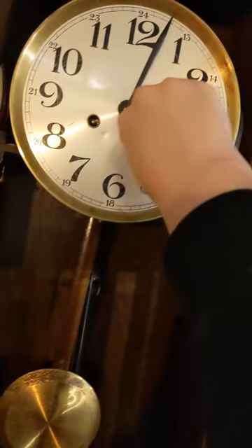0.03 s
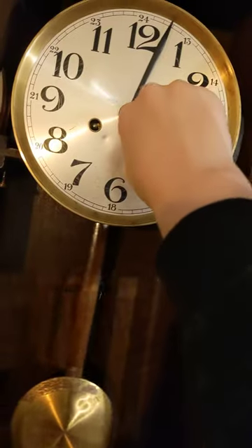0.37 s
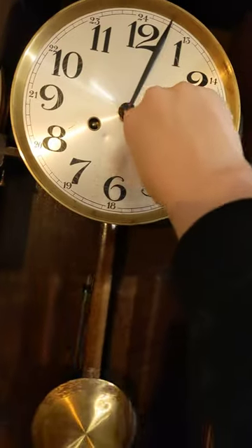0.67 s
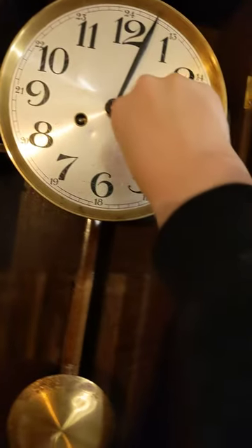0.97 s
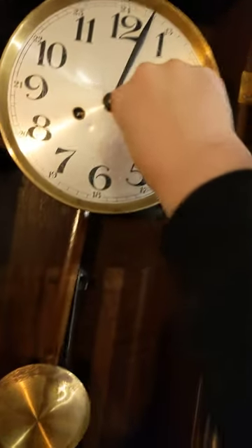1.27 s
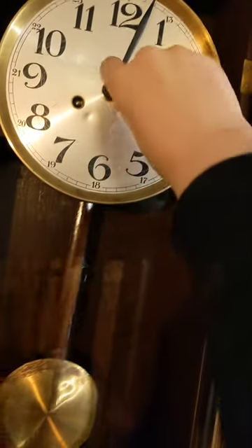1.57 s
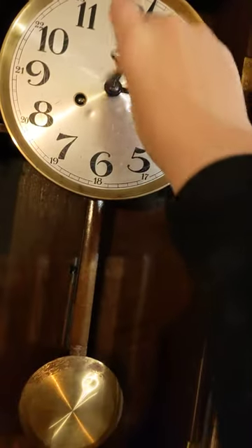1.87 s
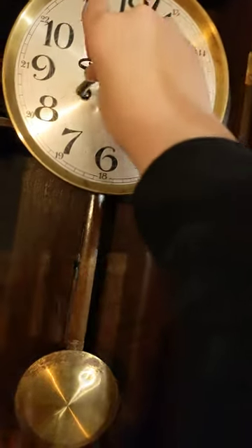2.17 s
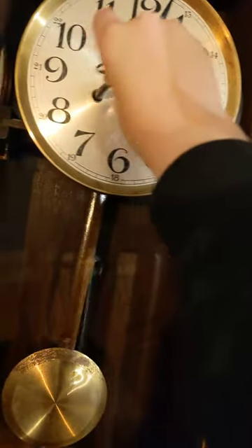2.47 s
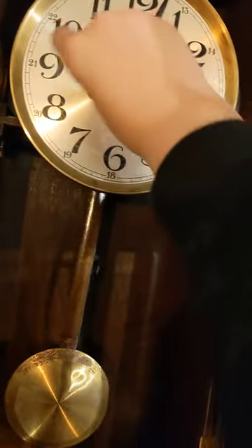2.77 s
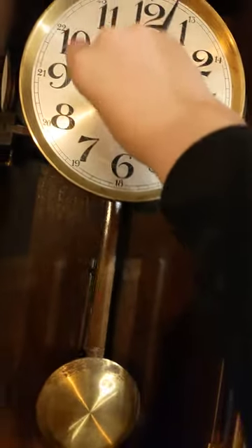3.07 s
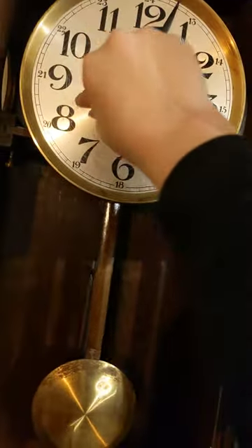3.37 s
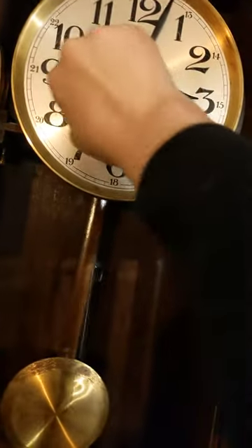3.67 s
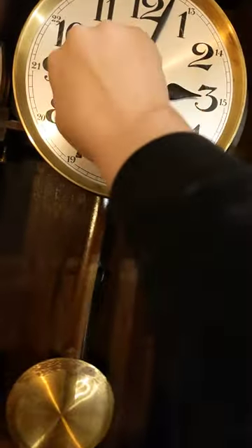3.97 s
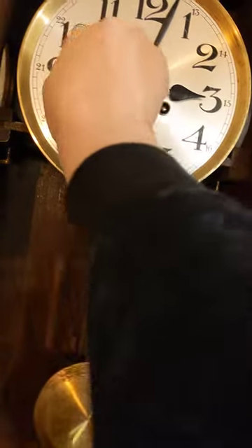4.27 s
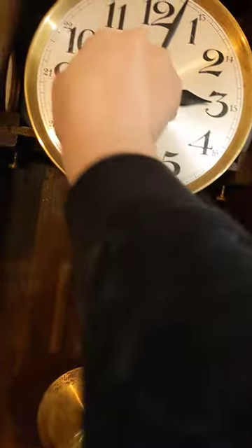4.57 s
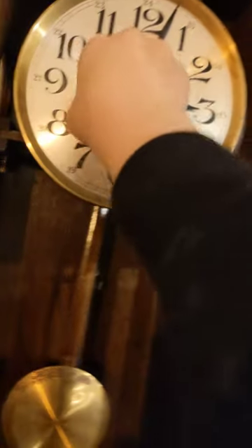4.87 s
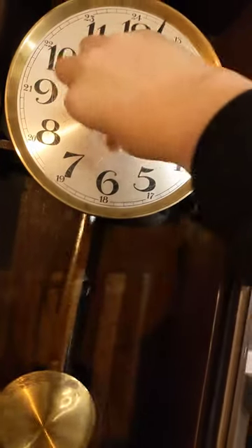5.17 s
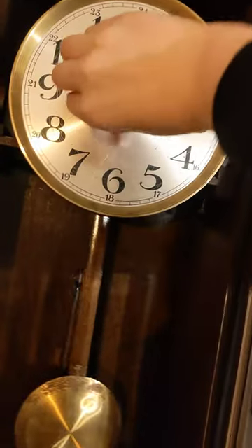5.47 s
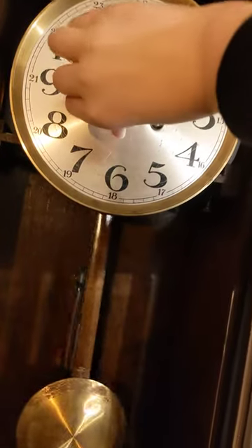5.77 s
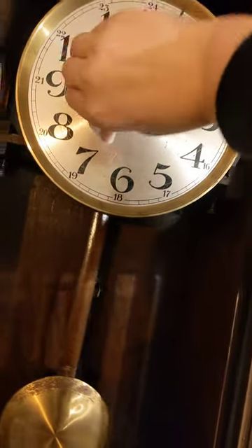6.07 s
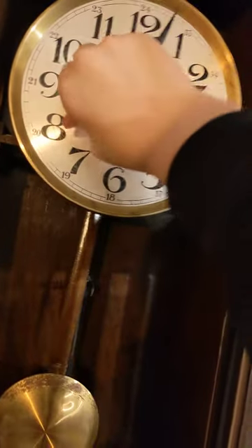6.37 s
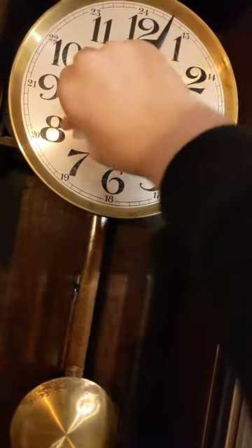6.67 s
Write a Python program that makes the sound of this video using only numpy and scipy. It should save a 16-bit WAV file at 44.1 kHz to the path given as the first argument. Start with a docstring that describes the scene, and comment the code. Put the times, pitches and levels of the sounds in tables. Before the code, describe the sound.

A pendulum wall clock ticks faintly and evenly, close by in a small quiet room. For the first few seconds a steel key clacks and scrapes lightly into place, while a hand bumps the wooden case and a sleeve rustles softly. Then the key turns, giving three loud, sharp ratchet clicks. After a pause, a second turn gives four more.

```python
"""A pendulum wall clock is wound with a key, close by in a small room.
From the start the escapement ticks, about every 0.6 s. Over the first three seconds the steel key clacks
and scrapes onto its arbor, while the hand bumps the wooden case and a sleeve rustles. Just after 4 s a first
turn lets the pawl snap over three ratchet teeth, and just after 6 s a second turn over four more;
each impact excites the modes of the pawl spring, the brass movement and the case."""
import sys
import numpy as np
from scipy import signal
from scipy.fft import rfft, irfft, next_fast_len
from scipy.io import wavfile
from scipy.ndimage import map_coordinates

SR = 44100
rng = np.random.default_rng(int(sys.argv[2]) if len(sys.argv) > 2 else 0)


def unload_wav(signal):
    """Save mono or channel-first audio to the path in sys.argv[1] as 16-bit WAV at rate SR, clipped to [-1, 1]."""
    wavfile.write(
        sys.argv[1],
        SR,
        np.round(np.clip(np.atleast_2d(signal).T, -1, 1) * 32767).astype(np.int16),
    )


N = 295911
TIME = np.arange(N) / SR
RING_SIZE = SR // 2
AGE = np.arange(RING_SIZE) / SR  # time since an impact, t/s


# the pawl drops off a tooth: t/s, relative levels of snap/dB, thump/dB and spring/dB, hardness/dB
PAWL_DROPS = [(4.099, -12.5, -26, -30.5, -1.5), (4.259, -15.5, -57.5, -29, 7),
              (4.4566, -12.5, -32.5, -43, 1.5), (6.161, -13, -65, -42, 4), (6.26, -11, -29.5, -34.5, 4),
              (6.3519, -10, -31, -36, -0.5), (6.5251, -13, -33.5, -41.5, 2.5)]
# spectrum of the snap: f/Hz, level/dB
SNAP_SPECTRUM = [(100, -14.5), (400, -11), (900, -1.5), (1500, -2.5), (2600, 1), (3100, -3.5), (5200, 0),
                 (6500, 1), (8000, -2), (10000, -5), (11700, 3), (12700, 0), (14500, 2.5), (15700, 2)]
# spectrum of the case's response to the snap: f/Hz, level/dB
CASE_SPECTRUM = [(60, -31), (200, -11), (300, -16), (450, -3.5), (800, -1.5), (1400, -5.5), (2000, -2),
                 (2600, -6.5), (3000, -6.5), (3600, -6.5), (6000, -6), (10000, -10), (13500, -8),
                 (16000, -20)]
# stereo balance of the pawl: f/Hz, left minus right level/dB
PAWL_BALANCE = [(300, -2), (2500, 1), (4000, -2.5), (6000, 0), (9500, -6.5), (12500, -3), (15500, -13.5)]
# modes of the brass movement: f/Hz, level/dB, T60/s
MOVEMENT_MODES = [(389, -9, .4), (490, -5, .35), (530, -5, .38), (648, -5, .25), (812, 2.5, .2),
                  (834, -4, .2), (1029, -1, .25), (1190, -4, .18), (1405, -4, .22), (1823, -3, .15),
                  (2012, -3, .13), (2135, -2, .13), (2385, -3, .16), (2471, -3, .16), (3731, -4, .11),
                  (4204, -3, .11), (5367, -1, .07), (5818, -1, .06), (6310, -1, .07), (6820, -2, .09),
                  (7660, -2, .06), (8960, -2, .06), (13620, 3, .05)]
# modes of the pawl spring: f/Hz, level/dB, T60/s
SPRING_MODES = [(2565, -2, .15), (2611, 0, .19), (2680, -4, .11), (2770, -1, .14)]
def ratchet(variation=0.89, snap_t60=0.023, snap_gain_db=15.5, case_db=-23.5, wall_delay_s=0.021):
    """Impact excitation: the pawl slaps the same wheel at each tooth, ringing spring, movement and case."""
    track = np.zeros((2, N))
    wheel, case = noise(SNAP_SPECTRUM, PAWL_BALANCE), noise(CASE_SPECTRUM, PAWL_BALANCE)
    # the blow spreads through the plates for a few milliseconds, then drains into the case
    envelope = rise(.0024) ** 2 * decay(snap_t60)
    for t, snap_db, thump_db, spring_db, hardness_db in PAWL_DROPS:
        contact = unit(wheel + variation * noise(SNAP_SPECTRUM, PAWL_BALANCE))
        snap = amp(snap_db + snap_gain_db) * contact * envelope
        snap = chatter(resonance(snap, hz=5300, q=1, db=hardness_db), spread_s=.0016, rebound=.42)
        body = unit(case + variation * noise(CASE_SPECTRUM, PAWL_BALANCE))
        body = chatter(reverberation(body, attack_s=.004), spread_s=.002, rebound=.35)
        body += amp(-13.5) * ring(MOVEMENT_MODES, scatter_db=1)
        spring = ring(SPRING_MODES, scatter_db=5)
        add(track, t, snap + amp(case_db) * body + amp(thump_db) * thump() + amp(spring_db) * spring)
        add(track, t + wall_delay_s, amp(-18) * snap)  # reflection from a wall
    return track


def thump(hz=55, t60=0.063, jolt_db=30, jolt_t60=0.0056):
    """Damped oscillation: a jolt and a low swing under the snap, mostly on the right."""
    swing = np.cos(2 * np.pi * hz * AGE) * decay(t60)
    jolt = amp(jolt_db) * decay(jolt_t60)
    highpass = signal.butter(N=4, Wn=44, btype="high", fs=SR, output="sos")
    return signal.sosfilt(highpass, (swing + jolt) * rise(.003)) * amp([[-17], [5]])


# the key hits the arbor: t/s, level/dB, relative level of the bright edge/dB
KEY_CLACKS = [(0.422, -44.5, -2.5), (0.723, -59, 0), (1.786, -31, -2), (1.796, -43, 1), (2.36, -41, -3),
              (2.387, -42, -11), (2.509, -27, -27), (2.53, -22.5, -7), (2.981, -28, -26), (3.603, -56, -9),
              (3.916, -48.5, -27), (4.001, -44, -37.5), (4.683, -51.5, -4), (6.046, -53, 4.5)]
def key_clacks(case_db=-4, case_hz=470):
    """Mechanical coupling: each clack of the key on its arbor also drives the case."""
    track = np.zeros((2, N))
    for t, db, edge_db in KEY_CLACKS:
        add(track, t - .0015, amp(db) * (steel(edge_db) + amp(case_db) * wood(case_hz)))
    return track


# spectrum of a steel contact: f/Hz, level/dB
STEEL_SPECTRUM = [(300, -19), (700, -2.5), (1000, 3), (1400, -6.5), (2100, -0.5), (2650, -3), (3050, -7),
                  (4200, -17), (6000, -18), (12000, -45.5)]
# spectrum of the bright edge of a hard contact: f/Hz, level/dB
EDGE_SPECTRUM = [(2000, -59), (4000, 4), (6000, 1), (9000, -2), (14500, -10.5), (16000, -13)]
# modes of the key on its arbor: f/Hz, level/dB, T60/s
KEY_MODES = [(1034, -7, 0.15), (1313, -1, 0.13), (1650, -16, 0.11), (1987, -1, 0.096), (2243, -2.5, 0.12),
             (2630, -5, 0.14), (2690, -7.5, 0.15), (3070, -13.5, .12), (3960, -7, 0.082),
             (4260, -11.5, 0.1)]
def steel(edge_db, ring_db=-15, edge_gain_db=1):
    """Hard impact: brief contact of steel on steel gives a clack, a bright edge and the key's ring."""
    modes = ring(KEY_MODES, scatter_db=4)
    clack = impact(STEEL_SPECTRUM, attack_s=0.0022, t60=0.056, room_db=-12)
    edge = impact(EDGE_SPECTRUM, attack_s=0.0018, t60=0.043, room_db=-16.5)
    return clack + amp(ring_db) * modes + amp(edge_db + edge_gain_db) * edge


# the key slides on the arbor: start t/s, end t/s, level/dB, rasp f/Hz
KEY_SLIDES = [(1.736, 1.8, -52, 2000), (2.497, 2.506, -40.5, 2270), (2.636, 2.671, -43.5, 1620),
              (2.977, 3.015, -48.5, 2250), (4.078, 4.14, -44.5, 2700)]
def key_scrapes(slips_per_s=420, ring_db=-17):
    """Stick-slip friction: sliding steel catches and lets go at random, each slip ringing the key."""
    track = np.zeros((2, N))
    for start, end, db, rasp_hz in KEY_SLIDES:
        size = max(round((end - start) * SR), SR // 100)
        slipping = rng.random(size) < slips_per_s / SR
        slips = slipping * rng.standard_normal(size) * signal.windows.hann(size) ** .5
        contact = impact(STEEL_SPECTRUM, attack_s=.0005, t60=0.0087, room_db=-22)
        contact += amp(ring_db) * ring(KEY_MODES, scatter_db=5)
        rasp = signal.fftconvolve(slips[None], resonance(contact, rasp_hz, q=14, db=9), axes=1)
        add(track, start, amp(db) * rasp / (rasp[:, :size].std() + 1e-9))
    return track


# the hand bumps the case: t/s, level/dB, struck panel f/Hz
CASE_BUMPS = [(0.799, -42, 325), (1.131, -54, 305), (1.467, -45.5, 360), (1.702, -36, 231),
              (1.735, -33.5, 356), (2.361, -34.5, 246), (2.492, -35, 465), (2.672, -30, 570),
              (2.875, -41.5, 460), (2.991, -32.5, 549), (3.172, -31.5, 334), (3.235, -33, 210),
              (3.463, -27, 403), (3.802, -41.5, 350), (4.718, -43.5, 296), (4.912, -43, 337),
              (5.18, -35.5, 260), (5.19, -33, 488), (5.512, -49.5, 265), (5.924, -41.5, 480),
              (6.119, -42, 490)]
def case_knocks(rattle_db=-17.5):
    """Structure-borne vibration: each soft bump on the case also rattles the key a little."""
    track = np.zeros((2, N))
    for t, db, panel_hz in CASE_BUMPS:
        add(track, t - .0015, amp(db) * (wood(panel_hz) + amp(rattle_db) * steel(edge_db=-13)))
    return track


# spectrum of a thud on wood: f/Hz, level/dB
WOOD_SPECTRUM = [(40, -40.5), (85, -10), (135, -20), (180, -10.5), (230, 4), (280, 0.5), (380, 0),
                 (500, -1), (640, -12), (880, -5), (1200, -23.5), (3000, -65)]
# modes of the wooden case: f/Hz, level/dB, T60/s
PANEL_MODES = [(101, -9.5, 0.36), (176.6, -7.5, 0.35), (229.5, -2.5, 0.25), (272.7, -4, 0.24),
               (326, -6.5, 0.38), (352.8, -4.5, 0.34), (394.5, -6, 0.12), (438.3, -4, 0.15),
               (506.7, 5.5, 0.06), (527, 2.5, 0.12), (585, -2.5, 0.15), (637, -0.5, 0.15), (794, 1.5, 0.13)]
def wood(panel_hz, thud_db=-10, panels_db=-17):
    """Panel resonance: the point where the hollow case is pushed decides which panel responds most."""
    panels = ring(PANEL_MODES, scatter_db=4) * rise(.005)
    thud = impact(WOOD_SPECTRUM, attack_s=0.0037, t60=0.042, room_db=-6)
    return resonance(amp(thud_db) * thud + amp(panels_db) * panels, panel_hz, q=5, db=11)


# beats of the escapement: t/s, level/dB
ESCAPEMENT_BEATS = [(0.0557, -45.5), (0.6610, -41), (1.2925, -44.5), (1.9028, -42.5), (2.509, -35.5),
                    (3.1266, -42), (3.768, -46), (4.356, -40), (4.9945, -46), (5.591, -43.5)]
# spectrum of a tooth meeting the anchor: f/Hz, level/dB
TICK_SPECTRUM = [(300, -31), (700, -6.5), (1200, -8), (1500, -1.5), (1750, -16.5), (2000, 1.5), (2750, 2.5),
                 (3050, -14), (3400, -10.5), (5000, -20.5), (12000, -29)]
# modes of the anchor and escape wheel: f/Hz, level/dB, T60/s
ANCHOR_MODES = [(651.3, -9.5, 0.19), (1108, -10.5, 0.24), (1276, -15, 0.19), (1480, -11.5, 0.21),
                (1620, -14, 0.32), (1940, -6, 0.11), (2130, -6.5, 0.088), (2361, -8.5, 0.14),
                (2720, 5, .07), (2785, -1.5, 0.081), (3420, -15, 0.2), (3860, -20, 0.069),
                (4790, -26, 0.039), (5600, -11, 0.07), (6140, -11.5, 0.065), (8320, -12, 0.034),
                (11840, -9, 0.024), (14800, -15, .04)]
def escapement(contact_db=-1, modes_db=-6, edge_db=-7):
    """Periodic impact: at each swing of the pendulum the anchor stops a tooth, and both ring."""
    track = np.zeros((2, N))
    for t, db in ESCAPEMENT_BEATS:
        contact = amp(contact_db) * impact(TICK_SPECTRUM, attack_s=.0014, t60=.06, room_db=-10)
        modes = amp(modes_db) * ring(ANCHOR_MODES, scatter_db=6.5)
        edge = amp(edge_db) * impact(EDGE_SPECTRUM, attack_s=0.0028, t60=0.034, room_db=-14)
        add(track, t - .001, amp(db) * (contact + modes + chatter(edge, spread_s=0.00074, rebound=.5)))
    return track


# how hard the hand works the key: t/s, rubbing level/dB
GRIP_LEVELS = [(0, -72), (0.65, -74), (0.85, -64.5), (1.08, -73), (1.55, -63), (1.78, -68.5), (2.05, -72),
               (2.33, -74.5), (2.56, -60), (3.25, -56.5), (3.42, -68), (3.75, -67), (4.3, -59.5),
               (4.85, -65), (5.08, -65.5), (6.05, -67.5), (6.33, -57.5), (6.71, -67)]
# spectrum of the hand rubbing the key: f/Hz, level/dB
RUBBING_SPECTRUM = [(80, -33), (180, -6.5), (330, 3.5), (520, -2), (800, -8.5), (1500, -15.5),
                    (2600, -24.5), (4000, -45)]
def hand():
    """Friction noise: a firmer grip rubs the key, shakes the case and stirs the sleeve more."""
    grip_db = np.interp(TIME, *np.transpose(GRIP_LEVELS))
    tremor = wobble(knots_per_s=14)
    rumble = case_rumble(grip_db, tremor)
    rubbing = amp(grip_db + 1.4 * tremor) * steady_noise(RUBBING_SPECTRUM)
    return rumble + rubbing + sleeve(grip_db)


# the case rocks on the wall: peak t/s, rise/s, fall/s, level/dB
CASE_ROCKS = [(0.83, 0.094, 0.56, -59.5), (1.68, 0.12, 0.46, -52), (3.03, 0.22, 0.18, -66),
              (3.3, 0.31, 0.55, -52), (5.35, 0.64, 0.79, -61)]
# spectrum of the shaken case: f/Hz, level/dB
RUMBLE_SPECTRUM = [(20, -37.5), (40, -22), (58, 1), (105, 2), (135, -6), (250, -21), (600, -60.5)]
def case_rumble(grip_db, tremor, coupling_db=-5):
    """Forced vibration: the grip shakes the case and larger moves rock it; the two add in power."""
    drive = np.hypot(amp(grip_db + coupling_db), swells(CASE_ROCKS))
    return drive * amp(1.5 * tremor) * steady_noise(RUMBLE_SPECTRUM)


# sleeve and skin brush along: peak t/s, rise/s, fall/s, relative level/dB
SLEEVE_BRUSHES = [(0.79, 0.091, 0.17, -58.5), (1.41, 0.24, 0.09, -63.5), (1.57, 0.078, 0.05, -63.5),
                  (1.785, 0.11, 0.067, -51.5), (2.658, 0.021, 0.044, -49), (5.24, 0.35, 0.33, -61)]
# spectrum of rustling cloth: f/Hz, level/dB
SLEEVE_SPECTRUM = [(300, -20), (1000, -2.5), (2300, 8), (3500, -0.5), (6000, 1.5), (9000, -5.5),
                   (15000, -6)]
def sleeve(grip_db, cloth_db=-13, brush_db=-2):
    """Sliding friction: cloth gives a broadband rustle that follows the grip and swells at each brush."""
    drive = np.hypot(amp(grip_db + cloth_db), amp(brush_db) * swells(SLEEVE_BRUSHES))
    return drive * amp(0.64 * wobble(knots_per_s=40)) * steady_noise(SLEEVE_SPECTRUM)


# spectrum of the quiet room: f/Hz, level/dB
ROOM_SPECTRUM = [(15, -61.5), (25, -22), (43, -10), (64, -5.5), (127, -15), (190, -5.5), (229, -25),
                 (1330, -17.5), (2990, -23), (5280, -24), (16000, -33.5)]
def room_hush(db=-71):
    """Ambient noise: a faint, stationary floor, strongest in the bass."""
    return amp(db) * steady_noise(ROOM_SPECTRUM)


# decay times of case and room: f/Hz, T60/s
DECAY_TIMES = [(100, 0.16), (300, 0.35), (700, 0.24), (1900, 0.22), (4800, 0.21), (12800, 0.16)]
def reverberation(x, attack_s):
    """Frequency-dependent damping: the dense modes of case and room fade, each band at its own rate."""
    hz, t, spectra = signal.stft(x, SR, nperseg=256)
    damping = amp(-60 * t / along(DECAY_TIMES, hz)[:, None])
    return signal.istft(spectra * damping, SR, nperseg=256)[1][:, :RING_SIZE] * rise(attack_s)


# likeness of left and right: f/Hz, correlation (-1 to 1)
STEREO_CORRELATION = [(100, 0.94), (250, 0.78), (550, .6), (1100, 0.16), (3000, -0.057)]
def stereo_angle(hz):
    """Spatial coherence: the angle/rad whose cosine is the left-right correlation, high in the bass."""
    return np.arccos(np.clip(along(STEREO_CORRELATION, hz), -1, 1))


def noise(spectrum, balance=None, size=RING_SIZE):
    """Spectral shaping: stereo noise of rms 1, mixed from independent mid and side parts."""
    hz = np.fft.rfftfreq(size, 1 / SR)
    angle = stereo_angle(hz) / 2
    shaped = rfft(rng.standard_normal((2, size))) * amp(along(spectrum, hz))
    mid, side = shaped * [np.cos(angle), np.sin(angle)]
    tilt = amp(along(balance, hz) / 2) if balance else 1
    return unit(irfft([(mid + side) * tilt, (mid - side) / tilt], size))


def steady_noise(spectrum):
    """Stationary noise that lasts the whole scene."""
    return noise(spectrum, size=next_fast_len(N))[:, :N]


def impact(spectrum, attack_s, t60, room_db):
    """Direct and reverberant sound: a short contact, then the response of case and room."""
    direct = noise(spectrum) * rise(attack_s) * decay(t60)
    return direct + amp(room_db) * reverberation(noise(spectrum), 2 * attack_s)


def ring(modes, scatter_db):
    """Modal superposition: damped sines of scattered strength, the higher ones out of step in stereo."""
    hz, db, t60 = np.transpose(modes)[:, :, None]
    level_db = db + scatter_db * rng.uniform(-0.37, 1, (2, len(modes), 1))
    lag = stereo_angle(hz) * rng.choice([-1, 1], hz.shape)
    phase = rng.uniform(0, 2 * np.pi, hz.shape) + np.array([0 * lag, lag])
    partials = amp(level_db) * decay(t60) * np.sin(2 * np.pi * hz * AGE + phase)
    return partials.sum(1) * rise(0.00083)


def chatter(x, spread_s, rebound, count=3):
    """Comb filtering: hard parts rebound within moments, which colours each strike differently."""
    delays = np.round(rng.random(count) * spread_s * SR).astype(int) + 4
    strengths = rng.choice([-1, 1], count) * rebound
    contacts = np.bincount(np.r_[0, delays], np.r_[1, strengths])
    return signal.fftconvolve(x, contacts[None] / np.linalg.norm(contacts), axes=1)[:, :RING_SIZE]


def resonance(x, hz, q, db):
    """A second-order resonator lifts or cuts the band around hz."""
    b, a = signal.iirpeak(np.clip(hz, 100, SR / 3), q, fs=SR)
    return x + (amp(db) - 1) * signal.lfilter(b, a, x)


def swells(rows, depth_db=20):
    """Exponential growth and decay: the gain moves by depth_db over each rise and fall time."""
    return sum(amp(db - depth_db * np.maximum((t - TIME) / up, (TIME - t) / down))
               for t, up, down, db in rows)


def wobble(knots_per_s):
    """Random modulation: a smooth curve through Gaussian knots."""
    return map_coordinates(rng.standard_normal(400), [TIME * knots_per_s], mode="wrap")


def rise(attack_s):
    """Gaussian onset from 0 to 1."""
    return 1 - np.exp(-(AGE / attack_s) ** 2)


def decay(t60):
    """Exponential decay by 60 dB in t60 seconds."""
    return amp(-60 * AGE / t60)


def amp(db):
    """Level in decibels to amplitude ratio."""
    return 10 ** (np.asarray(db) / 20)


def unit(x):
    """Normalisation to rms 1."""
    return x / np.sqrt(np.mean(x ** 2) + 1e-20)


def along(points, hz):
    """Interpolation of (f/Hz, value) points on a logarithmic frequency axis."""
    f, values = np.transpose(points)
    return np.interp(np.log(hz + 1), np.log(f), values)


def add(track, t, sound):
    """Superposition of a stereo sound on the track at t seconds."""
    part = track[:, max(round(t * SR), 0):][:, :sound.shape[1]]
    part += sound[:, :part.shape[1]]


def scene():
    """Linear superposition of clock, key and hand over the hush of the room."""
    return ratchet() + escapement() + key_clacks() + case_knocks() + key_scrapes() + hand() + room_hush()


def record(dry, top_hz=16450, taper_hz=900):
    """Clipping and band limiting: the sound is held to full scale and tapers to silence at top_hz."""
    size = next_fast_len(N + SR // 2)
    ramp = np.clip((top_hz - np.fft.rfftfreq(size, 1 / SR)) / taper_hz, 0, 1)
    lowpass = np.sin(np.pi / 2 * ramp) ** 2
    return irfft(rfft(np.clip(dry, -1, 1), size) * lowpass, size)[:, :N]


dry = scene()
out = record(dry)
unload_wav(out)
```